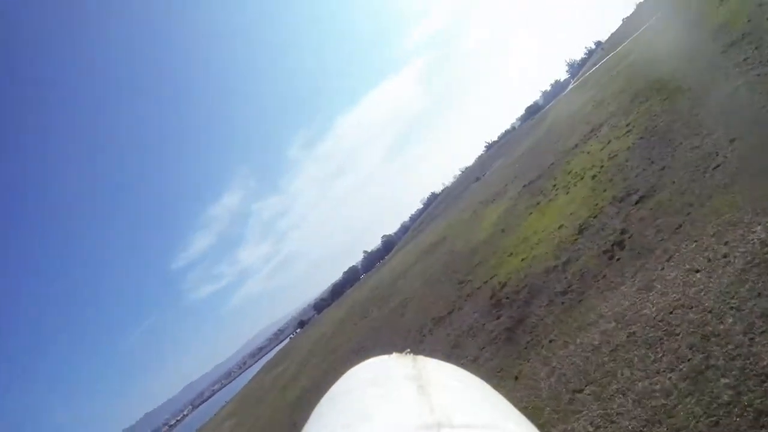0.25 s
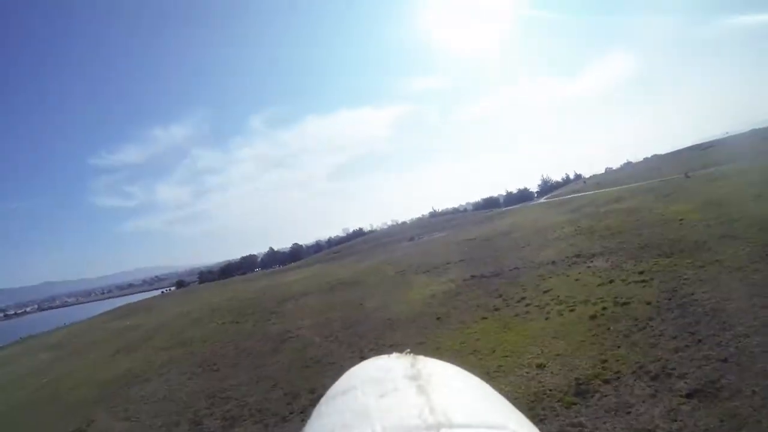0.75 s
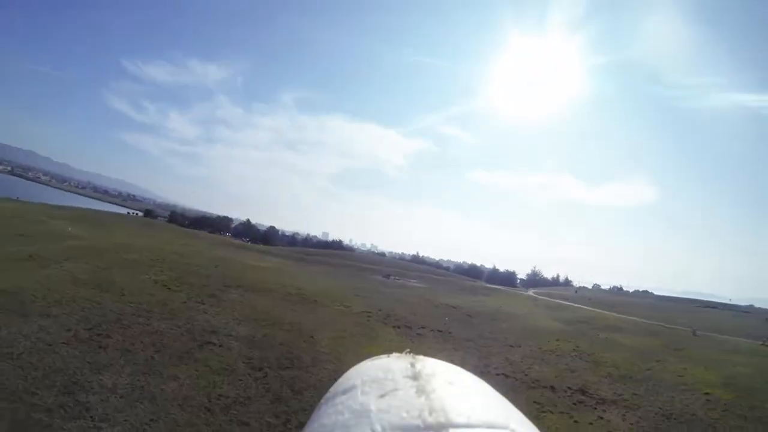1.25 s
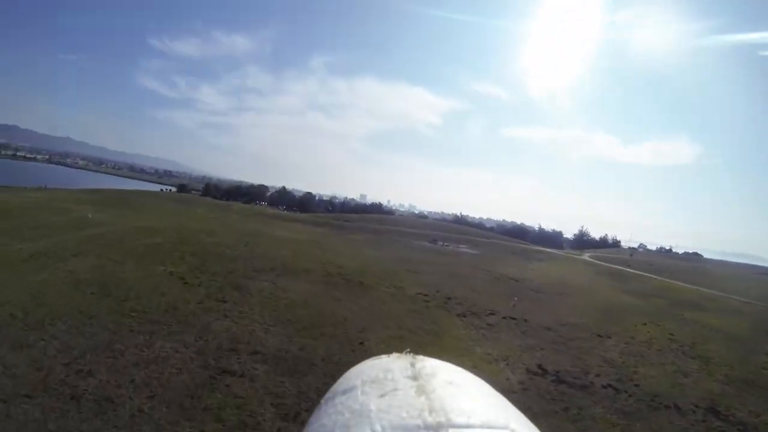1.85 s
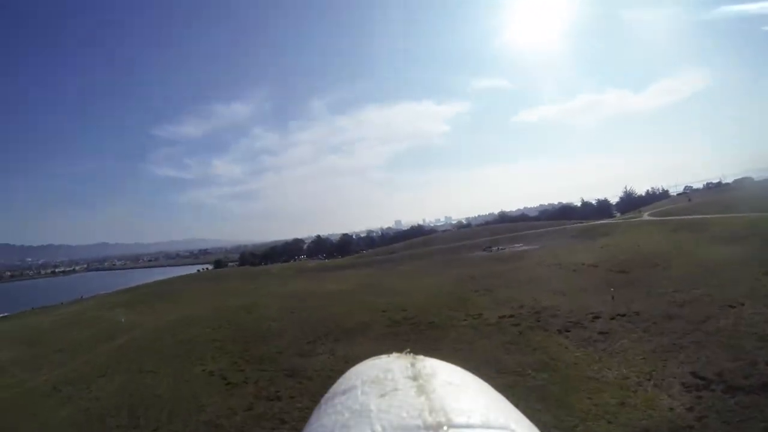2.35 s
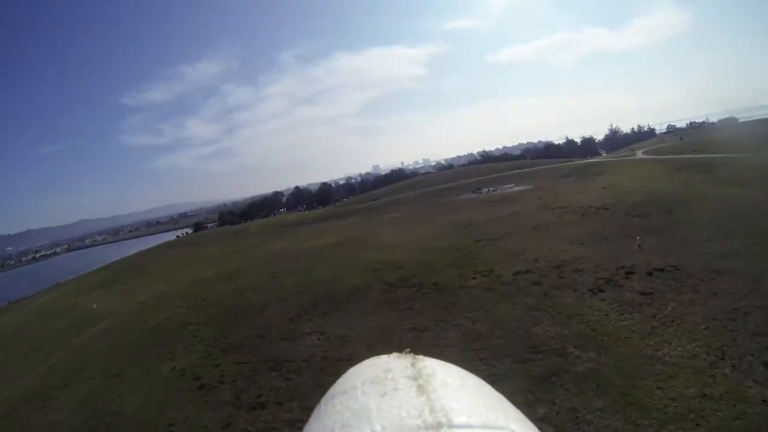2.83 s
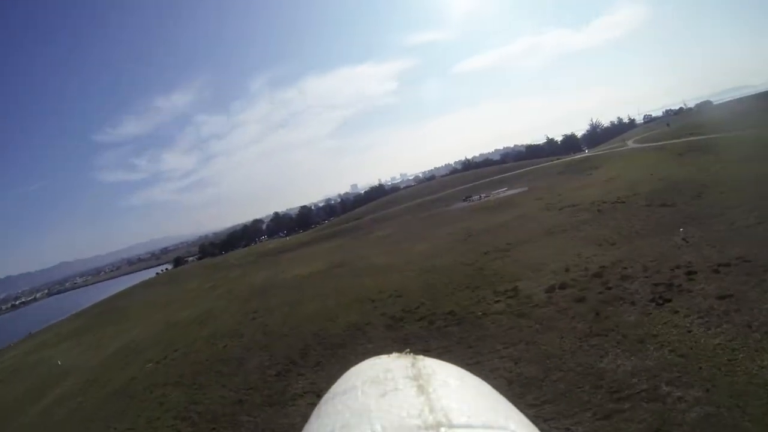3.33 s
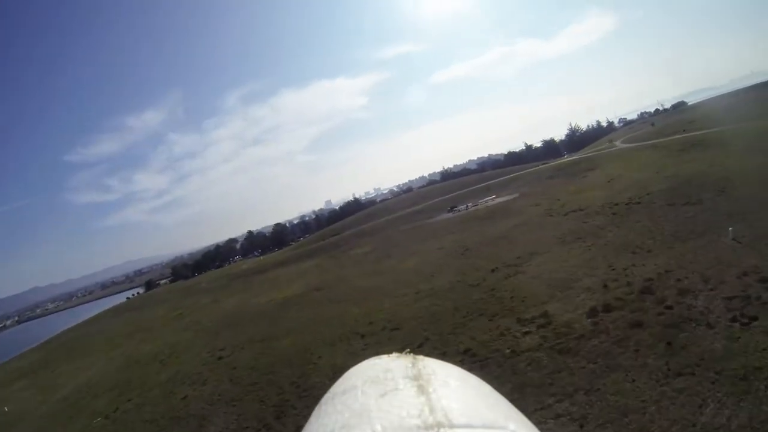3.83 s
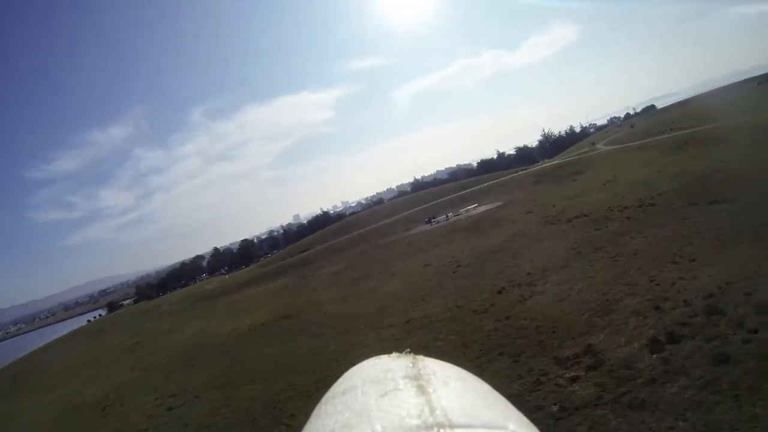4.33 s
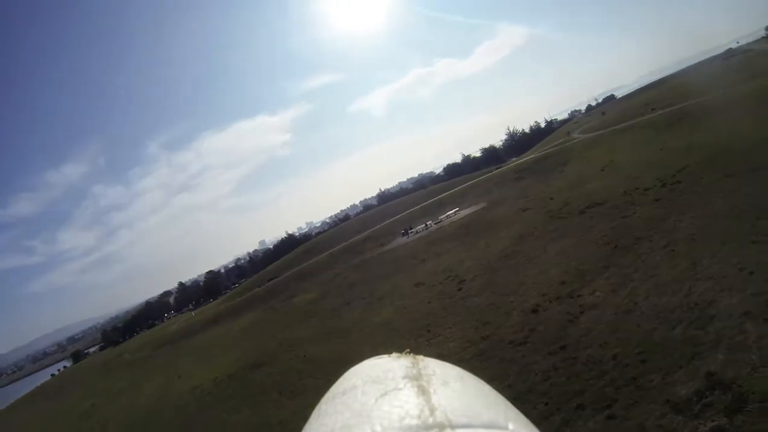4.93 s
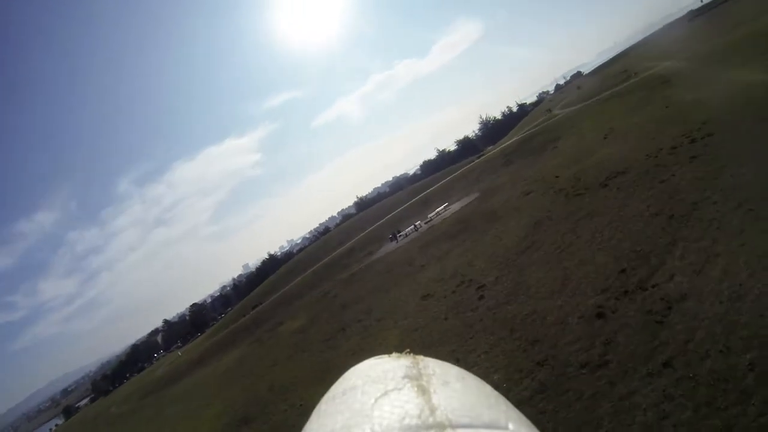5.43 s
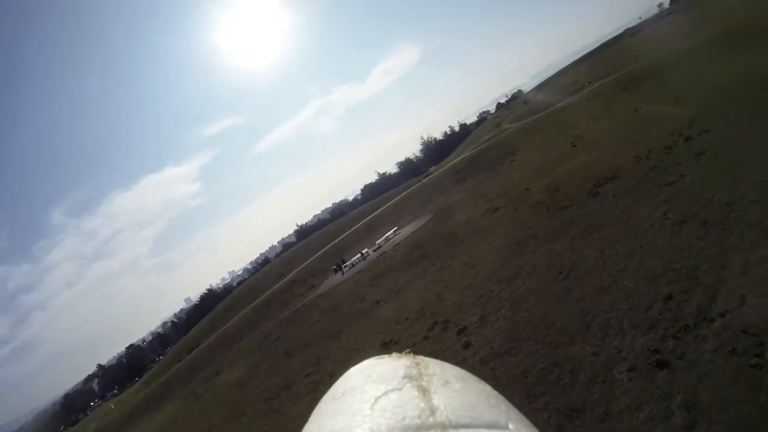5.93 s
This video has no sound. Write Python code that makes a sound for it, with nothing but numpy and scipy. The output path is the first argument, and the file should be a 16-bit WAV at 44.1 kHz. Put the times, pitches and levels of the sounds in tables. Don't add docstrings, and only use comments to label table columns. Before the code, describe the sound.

A microphone enclosed on a small electric glider is battered by airflow: a hollow mid-low roar with thin hiss and frequent blunt jolts that make the level duck and creep back. Behind it the propeller hums steadily, rises slightly, drops to a lower pitch before one and a quarter seconds, then climbs partway after four. Tiny plastic ticks appear.

```python
import sys
import numpy as np
from scipy import signal
from scipy.fft import rfft, irfft, next_fast_len
from scipy.io import wavfile
from scipy.ndimage import uniform_filter1d

SR = 44100
rng = np.random.default_rng(int(sys.argv[2]) if len(sys.argv) > 2 else 0)


def persist_wave(psi):
    counts = np.round(np.clip(psi, -1, 1) * 32767).astype(np.int16)
    wavfile.write(sys.argv[1], SR, np.atleast_2d(counts).T)


def volts(x):
    e = np.asarray(x, float) / 20
    return 10 ** e


N = 272097


# t/s, gustiness level/dB, airspeed as seam noise level/dB
AIRFLOW = [(0, 0, 5.5), (.3, 0, 1), (.7, -0.3, .5), (.95, 2.5, 1), (1.15, -0.1, -2), (1.45, 3, -1.5),
           (1.7, 0, 0.5), (2.2, 1.2, 0.5), (2.65, 4, 0), (2.9, 0.5, -3), (3.2, -2, -5), (3.5, 1.3, 0),
           (3.8, 1.1, -0.5), (4.1, 2.5, -2), (4.6, 0.5, -3.5), (5.3, 1.4, 0), (5.9, 1.5, -1),
           (6.17, -1.5, -2.5)]
# f/Hz, level per Hz/dB
CAVITY_ROAR = [(12, -43), (20, -11), (71, -7), (290, -6), (400, -2.5), (520, 0), (600, -3), (700, -9),
               (800, -12), (1170, -20), (1540, -19), (2800, -42), (3640, -51)]
# f/Hz, level per Hz/dB
SEAM_HISS = [(1400, -10.5), (2400, -2), (2800, -7), (4200, -3.5), (5100, -5), (6200, -9.5), (6900, -13.5),
             (7400, -13.5), (8300, -18), (9700, -18), (11400, -22.5), (12000, -26.5), (14200, -27),
             (15300, -31)]


def airflow():
    gusts_db, sizzle_db = in_time(AIRFLOW)
    rumble_db = 0.72 + 0.7 * gusts_db
    roar_db = 0.58 * gusts_db
    hiss_db = .1 * sizzle_db
    eddies_db = .3 * drift(40) + 1.15 * drift(220)
    cavity = turbulence(CAVITY_ROAR, shared_db=1.24 * eddies_db, own_db=0.24, own_rate=21)
    seams = turbulence(SEAM_HISS, shared_db=0.52 * eddies_db, own_db=0.37, own_rate=13)
    rumble, roar = split(cavity, 240)
    hiss, sizzle = split(seams, 8100)

    flank, roar = split(roar, 470)
    roar = roar + volts(-.9 * sizzle_db) * flank
    roar, rush = split(roar, 850)
    gust_db = -.5 * uniform_filter1d(gain_control(), size=500)
    low = volts(gust_db) * (volts(rumble_db) * rumble + volts(roar_db) * roar)
    low = low + volts(roar_db) * rush
    high = volts(hiss_db) * hiss + volts(sizzle_db) * sizzle
    return volts(-15.5) * lulls() * low + volts(-40) * high


def lulls():
    lull_db, lull_s = -5, .006
    dip = np.hanning(int(2 * lull_s * SR))
    marks = np.zeros(N)
    marks[((jolts()[:, 0] - lull_s / 2) * SR).astype(int)] = 1
    return volts(lull_db * signal.fftconvolve(marks, dip, "same"))


def buffets():
    cavity_hz, cavity_t60_s = 540, .009

    def swell(x):
        return resonate(resonate(x, cavity_hz, cavity_t60_s), cavity_hz, cavity_t60_s)

    height = np.abs(swell(np.eye(1, 2000)[0])).max()
    return volts(-3.5) * swell(clicks(jolts())) / height


# t/s, peak level/dB
LIGHT_BUFFETS = [(.199, -5), (.424, -6), (.493, -6), (.633, -4), (.846, -5), (1.089, -6), (1.161, -4),
                 (1.253, -5), (2.2, -4), (2.306, -4), (3.361, -8), (3.683, -3), (3.783, -7), (4.083, -4),
                 (4.285, -2.5), (4.343, -5), (4.474, -3.5), (4.632, -6), (5.17, -6), (5.389, -4.5),
                 (5.734, -6), (5.778, -4), (5.93, -4), (5.997, -5), (6.06, -4.5)]


def jolts():
    s, _, step_db = steps()
    strong = np.c_[s - .0016, -4.7 + .44 * step_db][1:]
    light = np.array(LIGHT_BUFFETS) + [.001, 0]
    return np.r_[strong, light]


# t/s, gain level just after/dB
STRONG_BUFFETS = [(0.0, -0.2), (0.146, -0.9), (0.288, -1.2), (0.68, 0), (0.998, 1), (1.362, 1.4),
                  (1.453, -3.5), (1.698, -4), (1.848, -4), (1.967, -1.8), (2.234, -1.6), (2.382, -2.5),
                  (2.489, -3), (2.681, -1.3), (2.753, -2.4), (2.871, -2.5), (3.028, -1.5), (3.213, -1.5),
                  (3.316, -2.5), (3.538, -3), (3.818, -1.5), (3.984, -1.5), (4.228, -1.5), (4.585, 0.5),
                  (4.661, -3), (4.788, -2), (4.881, -3.0), (5.095, -3.5), (5.48, -1.4), (5.693, -1.5)]


def steps():
    s, after_db = np.transpose(STRONG_BUFFETS)
    before_db = after_db[:-1] + climb(np.diff(s))
    return s, after_db, np.r_[0, before_db - after_db[1:]]


# t/s, shaft speed f/Hz, level of odd orders against even/dB
THROTTLE = [(0, 212.5, -5), (.76, 212.5, -5), (.93, 220.3, -1), (1.03, 220.5, -2), (1.22, 172.5, -8),
            (1.6, 170.8, -10), (2.72, 169.6, -9), (2.86, 167.6, -7), (4.12, 167.7, -7), (4.36, 185, -4),
            (6.17, 185.3, -4)]
# f/Hz, rms level/dB
AIRFRAME_TONES = [(160, -38), (340, -30), (370, -27.5), (430, -35), (675, -27), (745, -34), (850, -35),
                  (1010, -44), (1120, -42), (1280, -39), (1350, -45), (1690, -45), (2020, -50), (2400, -61),
                  (3020, -61), (4000, -66)]


def motor():
    shaft_hz, odd_db = in_time(THROTTLE)
    change = uniform_filter1d(np.abs(np.gradient(shaft_hz)) * SR, size=int(.1 * SR))
    prop_db = .5 - 6 * np.tanh((change / 90) ** 2)
    whistle_db = -58.5 + np.interp(shaft_hz, (188, 215), [0, -11])
    whistle = np.sin(2 * np.pi * 8007.5 * np.arange(N) / SR)
    out = volts(whistle_db + .5 * drift(12)) * whistle

    speed = shaft_hz * (1 + 0.00091 * drift(4.36))
    turn = 2 * np.pi * np.cumsum(speed) / SR
    for order in range(1, 21):
        level_db = at_hz(AIRFRAME_TONES, order * speed) + prop_db + odd_db * (order % 2) + .8 * drift(3)
        out += volts(level_db) * np.sin(order * turn + rng.uniform(0, 2 * np.pi))
    return np.sqrt(2) * out


# t/s, peak level/dB
AIRFRAME_TICKS = [
    (0.9931, -43),
    (1.3828, -32),
    (1.5085, -38),
    (2.2253, -47),
    (2.2847, -33),
    (3.9245, -35),
    (5.231, -41),
]


def ticks():
    hits = clicks(np.array(AIRFRAME_TICKS))
    return volts(-3) * (resonate(hits, 9000, .003) + resonate(hits, 10800, .0025))


def turbulence(spectrum, shared_db, own_db, own_rate):
    lowest_hz, highest_hz = spectrum[0][0], spectrum[-1][0]
    size = next_fast_len(N)
    hz = np.arange(1, size // 2 + 2) * SR / size
    coloured = rfft(rng.standard_normal(size)) * volts(at_hz(spectrum, hz))
    half_octave = 2 * np.log2(hz / lowest_hz)
    out = np.zeros(N)
    for k in range(int(2 * np.log2(highest_hz / lowest_hz)) + 2):
        band = irfft(coloured * np.clip(1 - np.abs(half_octave - k), 0, 1), size)[:N]
        in_step = min(lowest_hz * 2 ** (k / 2) / 1600, 1)
        out += band * volts(in_step * shared_db + own_db * drift(own_rate))
    return rms_one(out)


def drift(rate):
    r = np.exp(-40 * np.pi * rate / SR)
    slow = signal.lfilter([1], [1, -2 * r, r * r], rng.standard_normal(N // 20 + 2002))[2000:]
    return np.interp(np.arange(N) / 20, np.arange(len(slow)), rms_one(slow))


def resonate(x, hz, t60):
    r, w = volts(-60 / (t60 * SR)), 2 * np.pi * hz / SR
    return signal.lfilter([0, np.sin(w)], [1, -2 * r * np.cos(w), r * r], x)


def clicks(events):
    out = np.full(N, 1e-18)
    at = np.clip((events[:, 0] * SR).astype(int), 0, N - 1)
    out[at] = volts(events[:, 1]) * np.sign(rng.standard_normal(len(at)))
    return out


def split(x, hz):
    low = signal.sosfiltfilt(signal.butter(2, hz, fs=SR, output="sos"), x)
    return low, x - low


def rms_one(x):
    return x / np.sqrt(np.mean(x ** 2) + 1e-20)


def in_time(rows):
    s, *columns = np.transpose(rows)
    return [np.interp(np.arange(N) / SR, s, c) for c in columns]


def at_hz(points, hz):
    f, level_db = np.transpose(points)
    return np.interp(np.log(hz), np.log(f), level_db)


def gain_control():
    lag_s, attack_s = .003, .0015
    overshoot, settle_s = .15, .025
    dent_db, dent_s = -1.6, 0.098
    s, after_db, step_db = steps()
    t = np.maximum(np.arange(N) / SR - lag_s, 0)
    last = np.searchsorted(s, t, "right") - 1
    since = t - s[last]
    gain_db = after_db[last] + climb(since) - overshoot * step_db[last] * np.exp(-since / settle_s)

    dents = np.zeros(N)
    dents[((np.array(LIGHT_BUFFETS)[:, 0] + lag_s) * SR).astype(int)] = dent_db
    gain_db = gain_db + signal.lfilter([1], [1, -np.exp(-1 / (dent_s * SR))], dents + 1e-18)
    r = np.exp(-1 / (attack_s * SR))
    return signal.lfilter([1 - r], [1, -r], gain_db - gain_db[0]) + gain_db[0]


def climb(since):
    rate_db_per_s, slowing_s = 24, 0.26
    return rate_db_per_s * slowing_s * (1 - np.exp(-since / slowing_s))


def level_swells(x):
    threshold_db, squeeze, detector_s = -14, .35, .006
    r = np.exp(-1 / (detector_s * SR))
    level_db = 10 * np.log10(signal.lfilter([1 - r], [1, -r], x ** 2) + 1e-12)
    excess_db = np.maximum(level_db - threshold_db, 0)
    return x * volts(-squeeze * uniform_filter1d(excess_db, size=90))


TOP_EDGES = 14960, 15120, 15285


def band_limit(x, gain_db):
    hz, spectrum = np.fft.rfftfreq(N, 1 / SR), rfft(x)
    out = irfft(spectrum * (hz <= TOP_EDGES[0]), N)
    chance = .25 * gain_db + drift(22)
    for low, high, bar in zip(TOP_EDGES, TOP_EDGES[1:], (-.5, .8)):
        passes = uniform_filter1d(1. * (chance > bar), size=500)
        out += passes * irfft(spectrum * (hz > low) * (hz <= high), N)
    return out


def scene():
    return (airflow() + buffets() + motor() + ticks())[None]


def roll_off(x):
    return signal.sosfilt(signal.butter(12, 15870, fs=SR, output="sos"), x)


def record(dry):
    gain_db = gain_control()
    x = level_swells(dry * volts(gain_db))
    x = x / (1 + np.abs(x / .82) ** 8) ** (1 / 8) - .0027
    return roll_off(band_limit(x, gain_db))


dry = scene()
out = record(dry)
persist_wave(out)
```